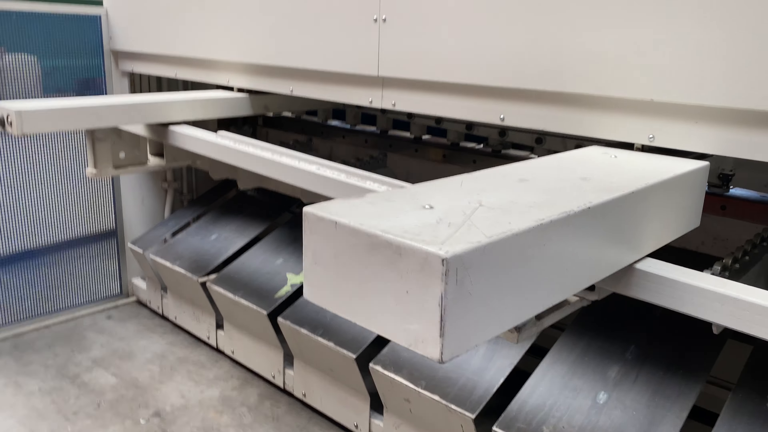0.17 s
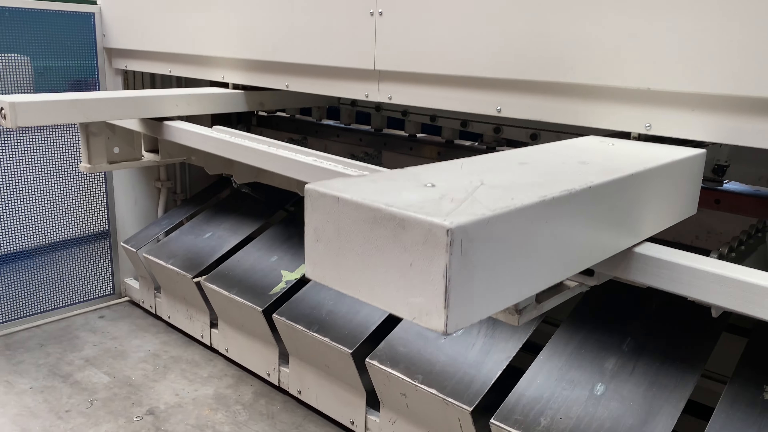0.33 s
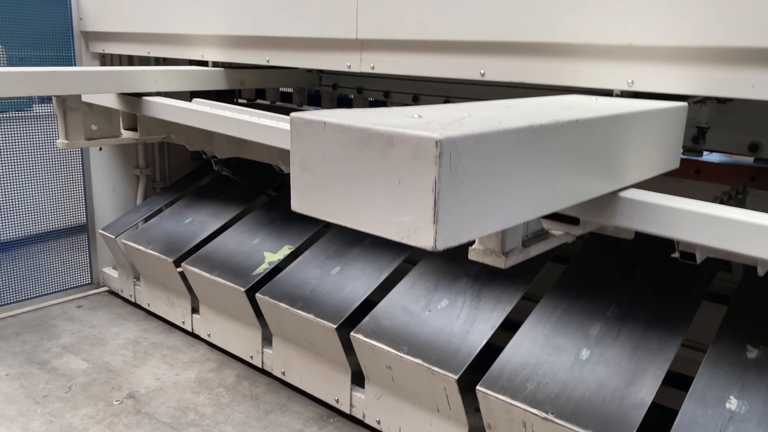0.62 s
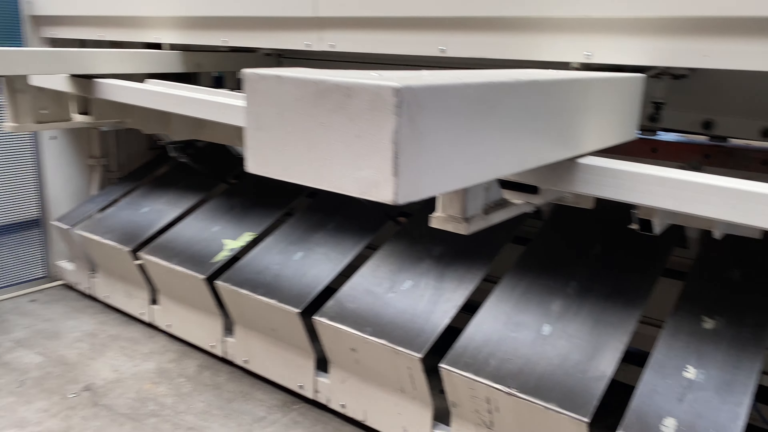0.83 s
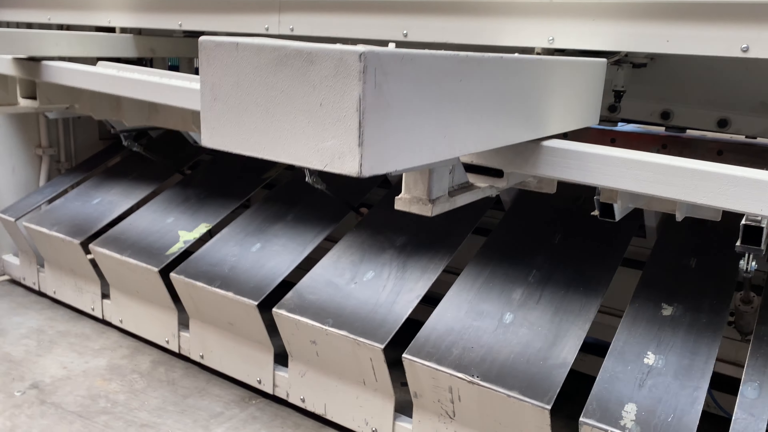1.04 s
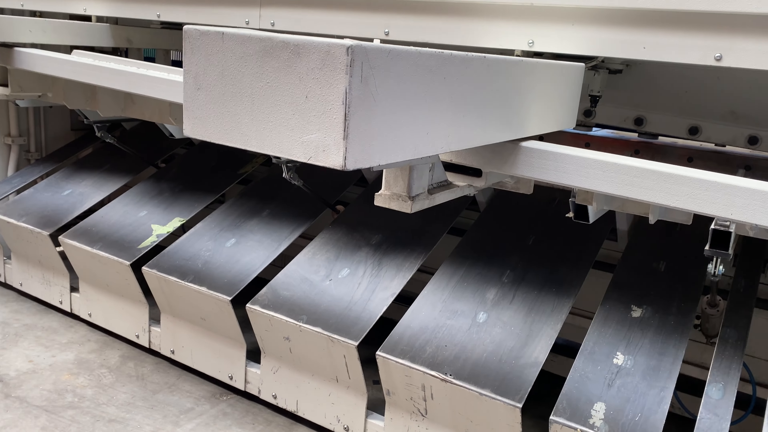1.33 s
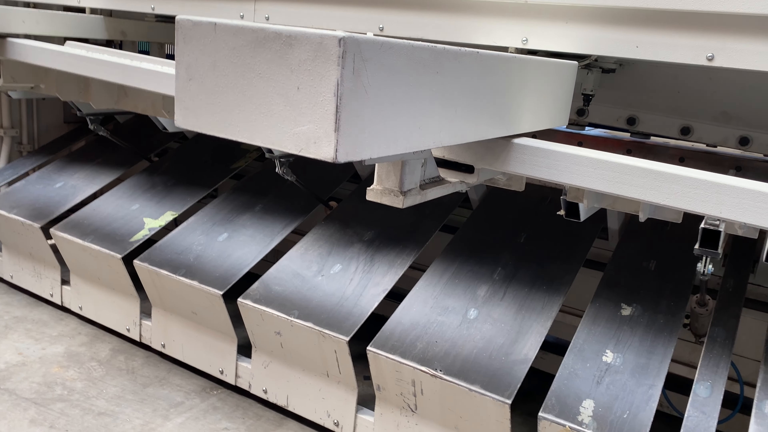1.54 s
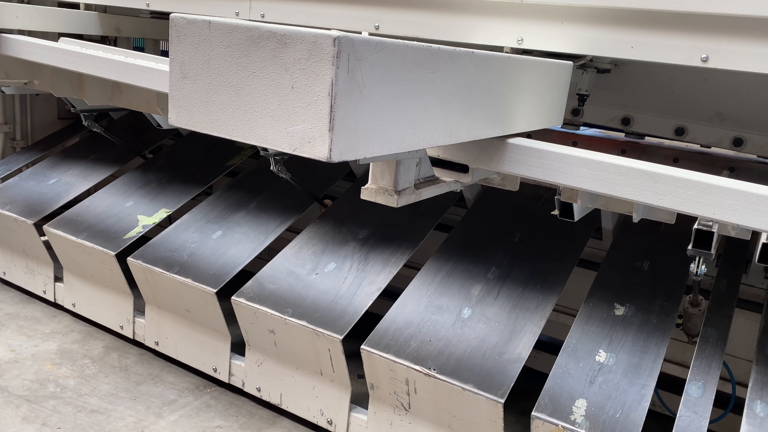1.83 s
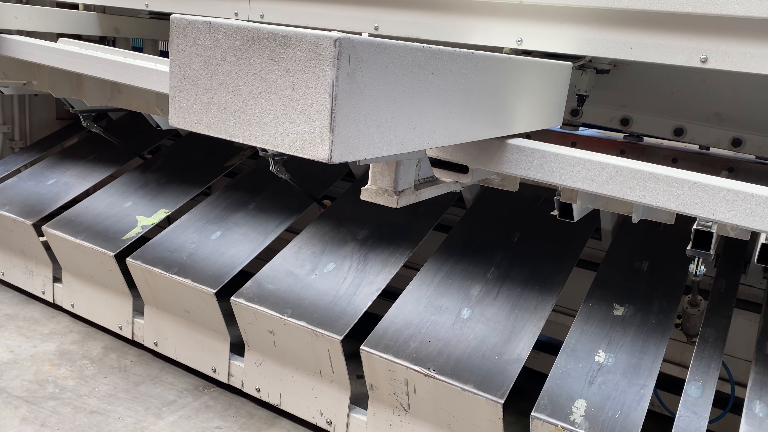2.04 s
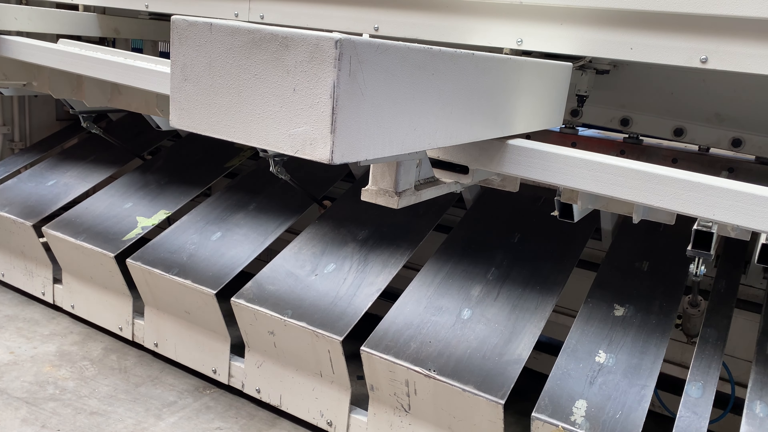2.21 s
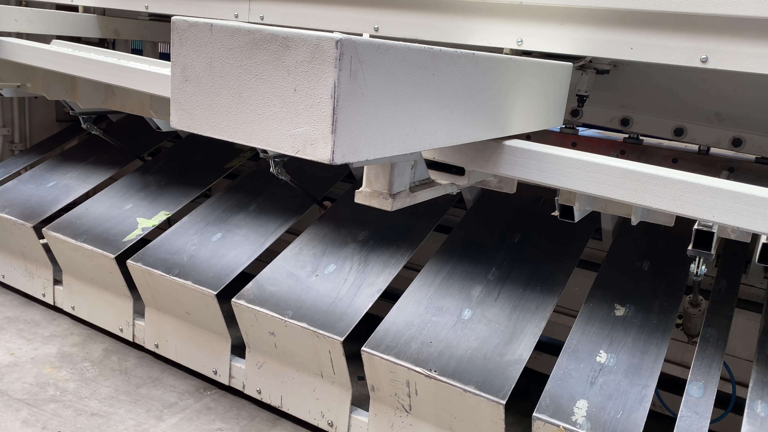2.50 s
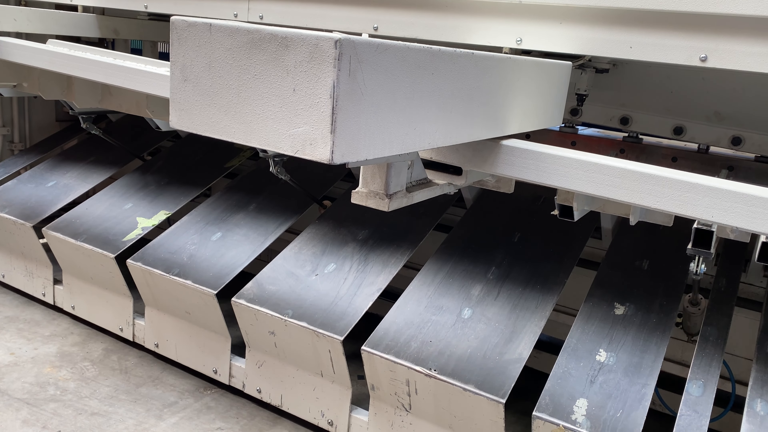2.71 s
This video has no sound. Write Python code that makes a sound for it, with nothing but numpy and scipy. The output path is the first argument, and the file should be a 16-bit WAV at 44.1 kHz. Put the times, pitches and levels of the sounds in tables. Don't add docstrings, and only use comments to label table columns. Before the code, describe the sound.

A hydraulic metal shear hums steadily, then clanks, slams and hisses air in a workshop.

```python
import sys
import numpy as np
from scipy import signal
from scipy.fft import rfft, irfft
from scipy.io import wavfile
from scipy.ndimage import uniform_filter1d

SR = 44100
rng = np.random.default_rng(int(sys.argv[2]) if len(sys.argv) > 2 else 0)


def int16_out(signal):
    q = np.round(np.clip(np.atleast_2d(signal).T, -1, 1) * 32767)
    wavfile.write(sys.argv[1], SR, q.astype(np.int16))


def voltage_ratio(level):
    return 10 ** (np.asarray(level, float) / 20)


N = 126126
T = np.arange(N) / SR
HZ = np.maximum(np.arange(N // 2 + 1) * SR / N, 1)
SIDE = np.array([[1], [-1]])
MAINS_HUM_HZ, SHAFT_HZ, TEETH = 100.0, 24.95, 13


def level(x, db):
    return x * voltage_ratio(db) / np.sqrt(np.mean(x ** 2))


def over_time(table, col=1):
    rows = np.array(table, float)
    return np.interp(T, rows[:, 0], rows[:, col])


def over_pitch(table, col=1):
    rows = np.array(table, float)
    return np.interp(np.log(HZ), np.log(rows[:, 0]), rows[:, col])


def peaks(table):
    return [(db, 1 / (1 + ((HZ - hz) / (width / 2)) ** 2)) for hz, width, db in table]


def walk(rate_hz):
    k = int(SR / rate_hz)
    steps = np.repeat(rng.standard_normal(N // k + 1), k)
    return uniform_filter1d(uniform_filter1d(steps, k), k)[:N]


# (frequency [Hz], likeness [0-1], left minus right [dB])
PORTS = [(148, 0.88, -0.5), (400, 0.76, 0), (900, 0.46, 1.5), (1560, 0, 0.5), (2330, 0.38, 2),
         (4200, 0.3, 7), (5750, 0.5, 9.5), (7460, 0.4, 3.5)]


def pair(gain, grit_db=0):
    grit = grit_db * rng.exponential(size=N // 40 + 1).repeat(40)[:N]
    a, b = rfft(rng.standard_normal((2, N)) * voltage_ratio(grit)) * gain
    like = np.clip(over_pitch(PORTS), 1.0 * (HZ < 150), 1)
    both = np.sqrt(1 + like) * a + SIDE * np.sqrt(1 - like) * b
    return level(irfft(both * voltage_ratio(SIDE * over_pitch(PORTS, 2) / 2), N), 0)


def tones(rows, hz, base_hz=0, gain_db=lambda k: 0):
    turn, out = 2 * np.pi * np.cumsum(hz) / SR, 0
    for k, left, right in rows:
        pitch = base_hz or k * hz[0]
        apart = np.array([[0], [1]]) * rng.standard_normal() * min(pitch / 1500, 1)
        lag = rng.uniform(0, 2 * np.pi) + apart
        fading_db = 3.5 * np.clip(pitch / 2000 - 1, 0, 1) * walk(2.5)
        db = np.array([[left], [right]]) + 1.4 * walk(7.06) + fading_db + gain_db(k)
        out = out + np.sqrt(2) * voltage_ratio(db) * np.sin(round(k) * turn + 2 * np.pi * base_hz * T + lag)
    return out


# (time [s], level [dB])
HUM_LEVEL = [(0, -15.5), (.6, -15), (1.05, -14.5), (1.4, -15), (2.5, -14.5), (2.53, -13.5), (2.575, -5.5),
             (2.605, -23), (2.64, -19), (2.675, -18), (2.71, -16.5), (2.76, -34.5), (2.785, -13.5),
             (2.86, -21.5)]
# (multiple of hum [1], left [dB], right [dB])
HUM = [(3, -58, -46.5), (4, -67.5, -55), (5, -52, -66.5), (10, -56, -56.5), (13, -51.5, -61),
       (14, -54, -59), (15, -59, -58.5)]


def mains_hum():
    hum_db = over_time(HUM_LEVEL) + 0.3 * SIDE
    hum = np.sqrt(2) * voltage_ratio(hum_db) * np.cos(2 * np.pi * MAINS_HUM_HZ * T + 2.76)
    return hum + tones(HUM, MAINS_HUM_HZ + 0 * T)


# (multiple of shaft [1], left [dB], right [dB])
SHAFT = [(2, -55, -57.5), (6, -54, -56.5), (2.98, -54.5, -50), (4.64, -54, -62.5), (6.856, -45.5, -41),
         (8.81, -63, -58.5), (19.17, -70.5, -59), (22.95, -60, -68), (25.02, -68, -60),
         (39.83, -55.5, -62.5), (43.95, -55, -54.5), (47.44, -43.5, -69), (48, -42.5, -46),
         (49.45, -60.5, -65.5)]


def shaft_tones(shaft_hz):
    return tones(SHAFT, shaft_hz)


# (multiple of tooth rate [1], left [dB], right [dB])
PUMP = [(1, -42, -37), (2.005, -43.5, -49), (3.01, -55, -63), (5.027, -53.5, -69), (8.04, -67.5, -78.5),
        (8.98, -69, -83), (9.96, -82.5, -76.5), (12.22, -74, -81), (15.27, -70.5, -86), (16.16, -66, -87.5),
        (17, -69, -86.5), (18, -67, -84.5), (19, -72.5, -76), (20.93, -65.5, -80.5), (22.2, -65, -75.5),
        (23, -74.5, -85.5), (23.8, -68.5, -84.5), (25.3, -74, -73), (26.2, -78, -84.5),
        (27.77, -79.5, -76.5), (28.6, -72, -79.5), (31, -72.5, -72), (33, -93.5, -98),
        (33.87, -75.5, -78.5), (35.2, -88, -90.5), (46, -93, -94)]
# (time [s], tooth tone [dB], overtones [dB])
PRESSURE = [(0, 2.5, 3.5), (.9, -1.5, 2), (1.05, 3.5, 5), (1.8, 5, 4.5), (1.92, 3, 10.5),
            (2.36, -0.5, 13.5), (2.42, 7, -3), (2.86, -5.5, -4.5)]
SURGE = [(16, -.3), (17, 0.81), (18, 0.54), (19, -0.3), (21, -0.89), (22, .2), (23, 0.99), (31, -0.081)]


def pump_whine(shaft_hz):
    shares = {round(multiple): share for multiple, share in SURGE}

    def pressure_db(k):
        share = 1 if k < 4 else shares.get(round(k), 0.3)
        return share * over_time(PRESSURE, 1 if k == 1 else 2)

    return tones(PUMP, TEETH * shaft_hz, gain_db=pressure_db)


# (offset in mains multiples [1], left [dB], right [dB])
SWITCH = [(-4, -72, -81.5), (-2, -71.5, -89.5), (0, -61, -65.5), (1, -74, -77.5), (2, -65.5, -98),
          (4, -74, -91)]
# (time [s], level [dB])
DUTY = [(0, -1), (.45, 0.5), (.7, 4.5), (.78, -4), (.9, 4.5), (1.5, 4.5), (2.3, 0), (2.86, 2)]


def drive_whistle():
    mains_hz = MAINS_HUM_HZ / 2 + 0 * T
    return tones(SWITCH, mains_hz, base_hz=4933.3, gain_db=lambda k: over_time(DUTY))


def motor():
    shaft_hz = SHAFT_HZ * (1 + 0.000404 * walk(1.91))
    return mains_hum() + shaft_tones(shaft_hz) + pump_whine(shaft_hz) + drive_whistle()


# (frequency [Hz], density [dB per Hz])
SHOP = [(30, -7), (90, 1.5), (300, 1), (1250, -2.5), (1900, -9), (4500, -25), (10500, -30), (15500, -33)]


def shop():
    octave = np.log2(HZ / 40)
    noise = rfft(pair(voltage_ratio(over_pitch(SHOP))))
    out = 0
    for k in range(10):
        band = irfft(noise * np.clip(1 - abs(octave - k), 0, 1), N)
        out = out + voltage_ratio(1.2 * walk(16)) * band
    return level(out, -40)


def bursts(rows, gain, pivot_hz, t60):
    lean = np.log2(np.maximum(HZ, 60) / pivot_hz) + 6 * np.log2(np.maximum(HZ / 10500, 1))
    out = 0
    for start, attack, hold, db, tilt_db in rows:
        fade = np.maximum(T - start - attack - hold, 0) / (t60 * (0.37 + min(hold / 0.061, 0.7)))
        rise = np.clip((T - start) / max(attack, 1e-4), 0, 1) ** 0.77
        colour = gain * voltage_ratio(np.minimum(tilt_db * lean, 9))
        out = out + voltage_ratio(db) * rise * voltage_ratio(-60 * fade) * pair(colour, grit_db=0.5)
    return out


# (frequency [Hz], width [Hz], level [dB])
FRAME = [(158, 25, -27.5), (239, 9.1, -26), (313, 39, -22.5), (510, 46, -29), (600, 41, -25),
         (740, 60, -25), (937, 29, -29), (1190, 48, -30.5), (1345, 68, -28), (1742, 43, -35),
         (2050, 260, -33), (2520, 76, -33), (2776, 19, -36)]


def frame_rings():
    return sum(10 ** (db / 10) * hump for db, hump in peaks(FRAME))


# (frequency [Hz], density [dB])
AIR = [(900, -22), (1750, -12.5), (2830, -5), (5300, -7), (7000, -11), (10000, -11), (13300, -18.5),
       (15000, -11)]


def air_colour():
    return voltage_ratio(over_pitch(AIR)) * (1 + 12 * np.sqrt(frame_rings())) / np.sqrt(1 + (1000 / HZ) ** 4)


# (frequency [Hz], width [Hz], level [dB])
NOZZLE = [(7800, 1100, 13.5), (14200, 1400, -10)]
# (time [s], attack [s], hold [s], level [dB], tilt [dB per octave])
TICKS = [
    (1.676, 0.00042, 0.0025, -36.5, -7.5),
    (1.775, 0.001, 0.019, -37.5, 3),
    (1.86, 0.033, 0.045, -55, 0),
    (1.915, 0.0032, 0.024, -48.5, -8.5),
]


def valve_ticks():
    nozzle = 1 + sum(voltage_ratio(db) * hump for db, hump in peaks(NOZZLE))
    tick = bursts(TICKS[:1], air_colour(), 5000, t60=0.08)
    return tick + bursts(TICKS[1:], air_colour() * nozzle, 5000, t60=0.15)


# (frequency [Hz], density [dB])
STEEL = [(18, -35), (42, -10.5), (100, 8), (200, -3.5), (700, -16.5), (1400, -9), (4000, -34), (8800, -59)]
# (time [s], attack [s], hold [s], level [dB], tilt [dB per octave])
BLOWS = [
    (2.33, 0.022, 0.03, -29, 0),
    (2.368, 0.0058, 0.033, -28, -4),
    (2.44, 0.0083, 0.029, -29.5, -6.5),
    (2.488, 0.02, 0.042, -12.5, -0.5),
    (2.56, 0.0051, 0.012, -12.5, -3.5),
    (2.61, 0.005, 0.055, -18.5, 2),
    (2.67, 0.0098, 0.017, -17.5, -1),
    (2.724, 0.0013, 0.033, -17, 2.5),
    (2.8, 0.019, 0.021, -34, 4.5),
]


def frame_blows():
    power = voltage_ratio(2 * over_pitch(STEEL) - 23.5) + 30 * frame_rings()
    steel = np.sqrt(power) / (1 + (HZ / 5000) ** 4)
    return bursts(BLOWS, steel, 630, t60=0.2)


# (time [s], attack [s], hold [s], level [dB], tilt [dB per octave])
VENTS = [
    (2.338, 0.019, 0.013, -32.5, -17),
    (2.368, 0.005, 0.019, -16.5, -2),
    (2.5, 0.038, .34, -27.5, 3.5),
    (2.483, 0.0032, .02, -22.5, 14),
    (2.495, 0.011, 0.052, -22, -1.5),
    (2.612, 0.0041, 0.028, -21, 4.5),
    (2.62, 0.037, 0.082, -18, -1),
    (2.723, 0.0017, 0.01, -11.5, 3.5),
    (2.75, 0.029, .1, -25.5, 0.5),
]


def air_vents():
    return bursts(VENTS, air_colour(), 5000, t60=0.15)


# (frequency [Hz], level [dB], t60 [s])
PLATE = [(480, -9.5, 0.1), (589.8, -5.5, 0.11), (710, -2, 0.15), (763, 1.5, 0.17), (975, -5, .25),
         (1130, -3.5, 0.12), (1345, -5.5, 0.068), (1794, -3, .2), (2040, -9.5, 0.26), (2310, -10, 0.34),
         (2710, -11, 0.22), (3346, -14.5, 0.23), (3680, -16.5, 0.082)]
# (time [s], level [dB], tilt [dB per octave])
KNOCKS = [(2.372, -18.5, -5.5), (2.488, -12.5, 11), (2.493, -13, 2.5), (2.501, -13, 7), (2.512, -6.5, -3),
          (2.517, 1, 2.5), (2.535, -15, -8.5), (2.565, -12, -6), (2.575, -9.5, -9), (2.617, -14.5, 4),
          (2.666, -9.5, 13.5), (2.687, -10, 5), (2.726, -5, -2), (2.733, -17, -2), (2.74, -5, -1.5),
          (2.756, -12.5, -3)]


def knocks():
    t, out = T[:SR // 3], np.zeros((2, N + SR))
    hz, db, t60 = np.array(PLATE, float).T[:, :, None]
    crack_band = signal.butter(2, [900, 7000], "bandpass", fs=SR, output="sos")
    for start, hit_db, tilt_db in KNOCKS:
        mix, detune, pan, lag = rng.standard_normal((4, len(PLATE), 1))
        size = voltage_ratio(db + 3 * mix + tilt_db * np.log2(hz / 1200) - 60 * t / t60)
        phase = 2 * np.pi * hz * (1 + 0.013 * detune) * t
        ring = [np.sum(size * voltage_ratio(s * (2.5 + 0.89 * pan)) * np.sin(phase + s * 0.35 * lag), axis=0)
                for s in (1, -1)]
        crack = voltage_ratio(10 - 60 * t / 0.013) * signal.sosfilt(crack_band, rng.standard_normal(len(t)))
        hit = np.array(ring) * np.minimum(t / 0.00043, 1) + crack * voltage_ratio(2 * SIDE)
        k = int(start * SR)
        out[:, k:k + len(t)] += voltage_ratio(hit_db - 18) * hit
    return out[:, :N]


def hall(x):
    t = T[:SR // 2]
    cloud = rng.standard_normal((3, len(t))) * voltage_ratio(-60 * t / 0.65) * (t > 0.008)
    low = signal.sosfiltfilt(signal.butter(2, 350, fs=SR, output="sos"), cloud)
    dull = signal.butter(1, 6000, fs=SR, output="sos")
    tail = signal.sosfilt(dull, cloud[:2] - low[:2] + low[2])
    tail = tail / np.sqrt(np.sum(tail[0] ** 2))
    return voltage_ratio(-8.5) * signal.fftconvolve(x, tail, axes=1)[:, :N]


def scene():
    steady = motor() + shop()
    ticks = valve_ticks()
    action = frame_blows() + air_vents() + knocks()
    return steady + ticks + action + hall(action + voltage_ratio(-5) * ticks)


# (frequency [Hz], lead [turns])
LEAD = [(6650, -1), (8400, -.5), (10150, 0), (12000, .5), (14000, 1), (15900, 1.5)]


def phone_ports(dry):
    left, right = rfft(np.tanh(0.54 * dry) / 0.67) / (1 + (HZ / 15850) ** 80)
    share = np.clip((HZ - 7300) / 2000 + 0.5, 0, 0.97)
    same = left * voltage_ratio(-2 * share)
    early = same * np.exp(2j * np.pi * over_pitch(LEAD))
    return irfft(np.array([same, np.sqrt(1 - share ** 2) * right + share * early]), N)


def roll_off(x):
    return signal.sosfilt(signal.butter(12, 15950, fs=SR, output="sos"), x)


def record(dry):
    mix = phone_ports(dry)
    return roll_off(mix)


dry = scene()
out = record(dry)
int16_out(out)
```